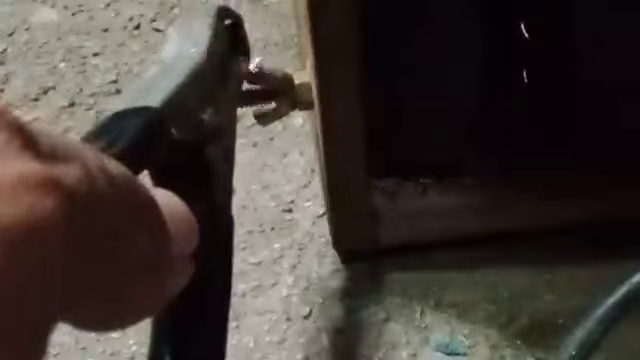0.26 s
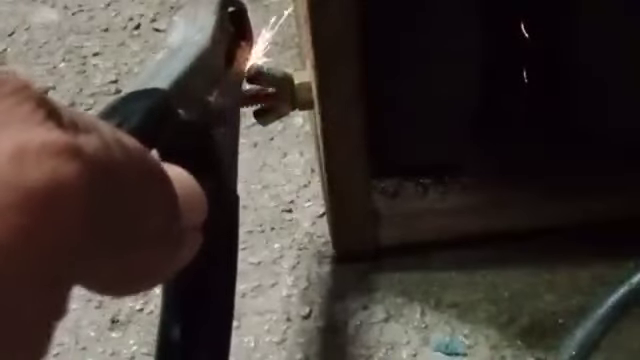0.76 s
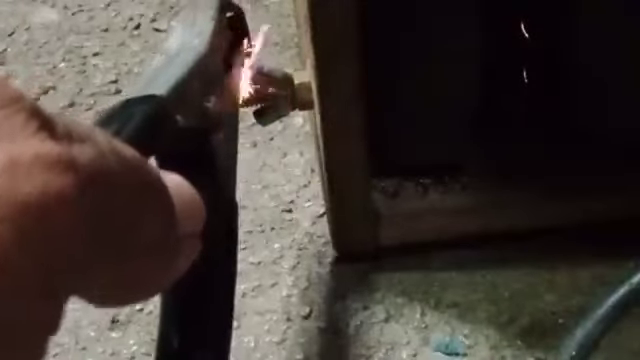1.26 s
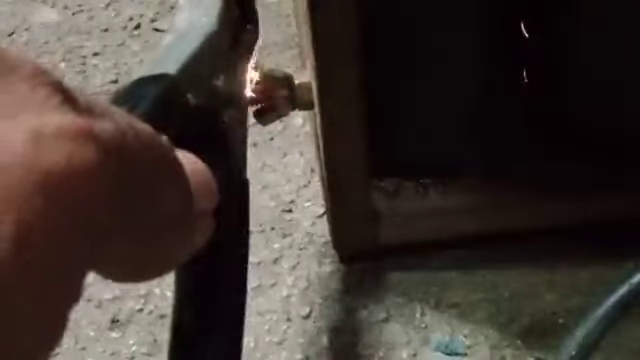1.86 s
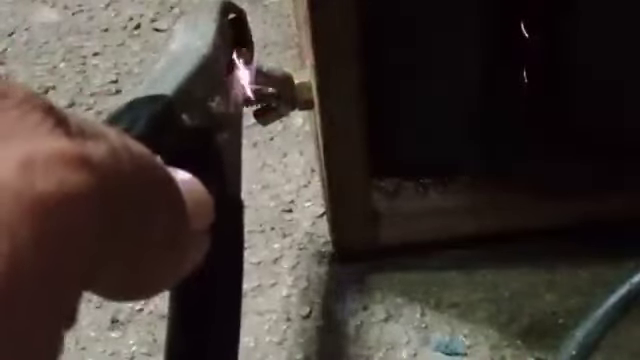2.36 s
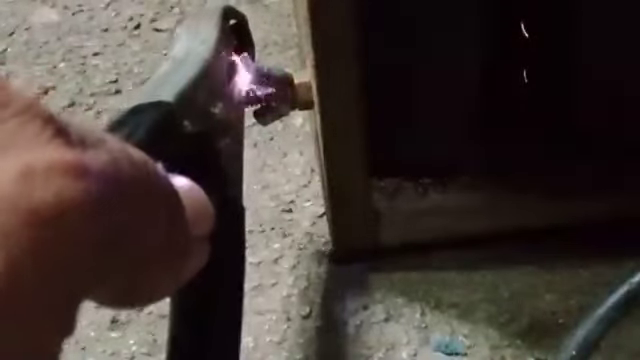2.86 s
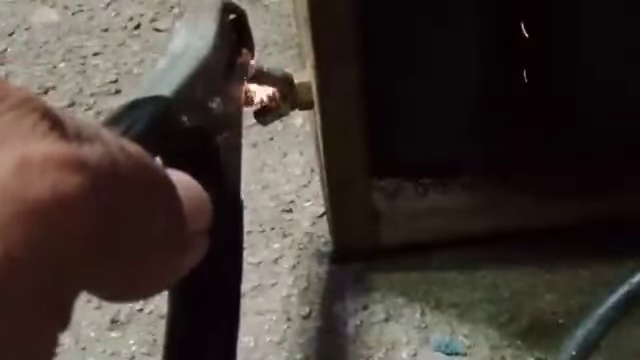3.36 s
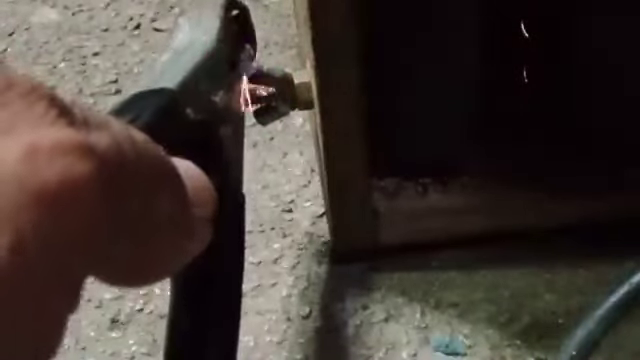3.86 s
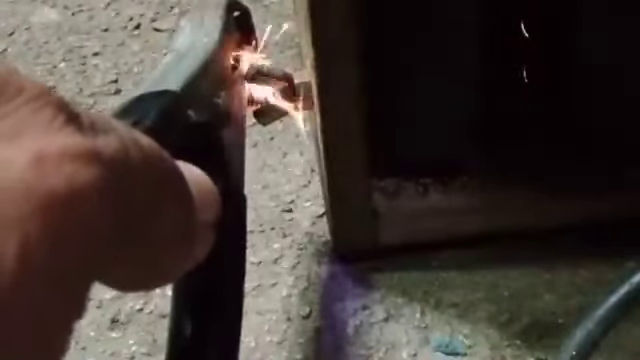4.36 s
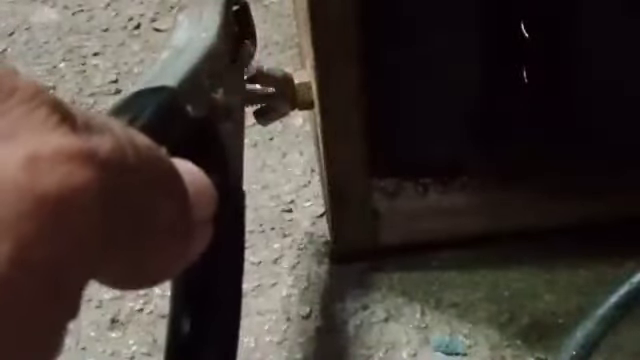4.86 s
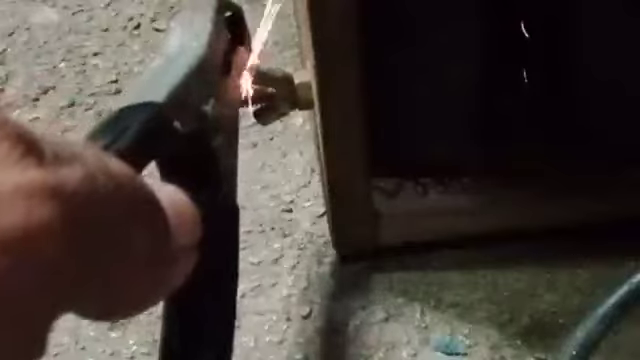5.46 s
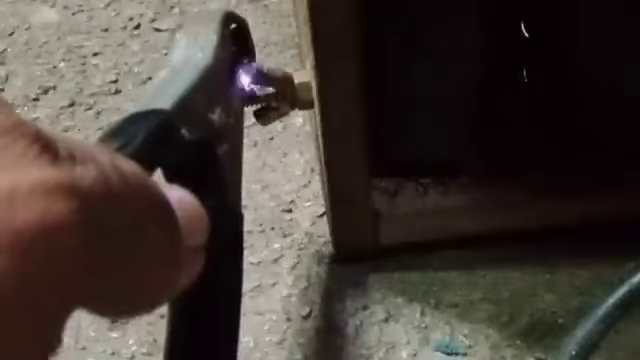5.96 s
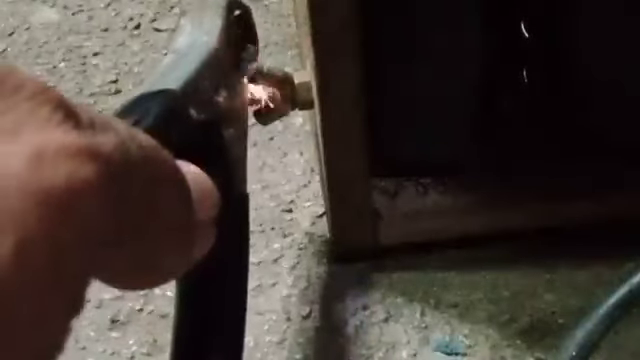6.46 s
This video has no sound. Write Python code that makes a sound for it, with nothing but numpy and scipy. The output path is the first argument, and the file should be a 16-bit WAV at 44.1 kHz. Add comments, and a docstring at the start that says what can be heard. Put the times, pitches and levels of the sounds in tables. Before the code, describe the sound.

From 0 to about 6.7 seconds a high-voltage arc buzzes without pause, close to the microphone in a small, quiet room. Around 333 uneven snaps a second fuse into a shrill, raspy buzz, strongest between about 2 and 4.5 kHz, with a fainter bright sizzle above it. Two small dry ticks fall near 0.15 and 0.35 seconds. Short sputters make the pitch sag slightly and the tone roughen, notably around 0.65, 1.0, 1.7, 2.6, 2.8 and 3.1. Near 2.2 the arc flares for about a tenth of a second, louder, brighter and slightly higher, with a dull puff. Further sputters come near 4.4, 5.3 and 5.9, with the strongest around 6.3 and at the very end, where the buzz is still running. Faint hum, low rumble and barely audible hollow blips lie beneath.

```python
"""A shrill electric buzz: a high-voltage arc jumps between a hand-held probe and a terminal, close by.
The gap fires about 333 times a second and every spark is a snap of a different size. The buzz sags
and roughens whenever the arc sputters, and flares up once. A bright sizzle is the edge of the same
snaps, scattered round the room. The supply hums at the firing rate, over filtered noise for a quiet
room, two small ticks made of short pushes, and faint hollow blips made of narrow noise."""
import sys
import numpy as np
from scipy import signal
from scipy.fft import rfft, irfft, next_fast_len
from scipy.io import wavfile
from scipy.ndimage import uniform_filter1d

SR = 44100
rng = np.random.default_rng(int(sys.argv[2]) if len(sys.argv) > 2 else 0)


def persist_wave(psi):
    """Save psi, clipped to +-1, as 16-bit WAV."""
    counts = np.round(np.clip(psi, -1, 1) * 32767).astype(np.int16)
    wavfile.write(sys.argv[1], SR, np.atleast_2d(counts).T)


N = 295822
TIME = np.arange(N) / SR  # [s]
FLARE_S, FLARE_LENGTH_S = 2.21, 0.09  # middle and length of the one flare


def amp(db):
    """Turns decibels into a gain."""
    return 10 ** (np.asarray(db) / 20)


def unit(x):
    """Scales a signal to an average (RMS) level of 1."""
    return x / np.sqrt(np.mean(x ** 2) + 1e-20)


def read(points, hz):
    """Reads a (frequency, value) table at any frequency, with straight lines on a log-frequency axis."""
    frequency, value = np.transpose(points)
    return np.interp(np.log(hz + 1), np.log(frequency + 1), value)


def control(table, column, t):
    """Reads one column of a table that changes over time, with straight lines between its points."""
    table = np.array(table)
    return np.interp(t, table[:, 0], table[:, column])


def add(mix, start_s, sound):
    """Adds a short sound to the mix at a given time."""
    part = mix[max(round(start_s * SR), 0):][:len(sound)]
    part += sound[:len(part)]


def wander(size):
    """Slow random motion of unit spread, smoothed twice over size samples."""
    once = uniform_filter1d(rng.standard_normal(N), size, mode="wrap")
    return unit(uniform_filter1d(once, size, mode="wrap"))


def flutter(depth_db, size):
    """A gain that wavers at random."""
    return amp(depth_db * wander(size))


def arch(middle_s, length_s):
    """A smooth rise to 1 and back, above one half for length_s."""
    return np.cos(np.pi / 2 * np.clip((TIME - middle_s) / length_s, -1, 1)) ** 2


def colour(x, spectrum, resonances=(), size=8192):
    """Filters a sound with a broad spectrum plus peaks and notches, without any sound ahead of time."""
    hz = np.fft.rfftfreq(size, 1 / SR)
    db = read(spectrum, hz)
    for middle_hz, width_hz, gain_db in resonances:
        db = db + gain_db / (1 + (2 * (hz - middle_hz) / width_hz) ** 2)
    # folding the cepstrum forward makes the filter respond as early as it can (minimum phase)
    cepstrum = irfft(np.log(amp(db)))
    cepstrum[1:size // 2] *= 2
    cepstrum[size // 2 + 1:] = 0
    response = irfft(np.exp(rfft(cepstrum)))
    return signal.oaconvolve(x, response)[:len(x)]


def steady(x, window_s):
    """Brings the short-term level to 1 and keeps the faster flutter."""
    return x / np.sqrt(uniform_filter1d(x ** 2, int(window_s * SR)) + 1e-12)


def room(x, reflected_db, t60, rise_s, even_hz):
    """Direct sound plus dense reflections that build up over rise_s and fall 60 dB in t60 seconds."""
    t, size = np.arange(SR // 3) / SR, next_fast_len(N + SR // 2)
    decay = amp(-60 * t / t60) * (1 - np.exp(-t / rise_s))
    tail = rng.standard_normal(len(t)) * decay
    response = 1 + amp(reflected_db) * rfft(tail / np.linalg.norm(tail), size)
    # flatten the colour over bands wider than even_hz
    response /= np.sqrt(uniform_filter1d(abs(response) ** 2, int(even_hz * size / SR)))
    return irfft(rfft(x, size) * response, size)[:N]


def impulses(spark_s, size):
    """A band-limited impulse at the exact time of each spark, even between two samples."""
    index = (spark_s * SR).astype(int)[:, None] + np.arange(-8, 9)
    offset = index - spark_s[:, None] * SR
    shape = np.sinc(offset) * np.sinc(offset / 9)
    train = np.zeros(N)
    np.add.at(train, np.clip(index, 0, N - 1), size[:, None] * shape)
    return train


def disperse(x, sweep_s, top_hz):
    """Below top_hz, lower pitches arrive later: each snap becomes a tiny falling chirp."""
    size = next_fast_len(N + 1024)
    hz = np.fft.rfftfreq(size, 1 / SR)
    delay_s = sweep_s * np.maximum(1 - hz / top_hz, 0)
    phase = 2 * np.pi * np.cumsum(delay_s) * SR / size
    return irfft(rfft(x, size) * np.exp(-1j * phase), size)[:N]


# colour of the low room rumble: (frequency [Hz], relative level [dB])
RUMBLE_COLOUR = [(15, -41), (25, -12), (59, -9), (134, -6), (167, -8), (280, -6.5), (360, -21), (620, -120)]
# colour of the dull rush under the buzz: (frequency [Hz], relative level [dB])
RUSH_COLOUR = [(150, -17.5), (290, 1), (370, 1.5), (460, -18), (560, -6.5), (700, -3), (900, -5),
               (1150, -8), (1500, -21)]


def background(floor_db, rush_db, flare_db):
    """Filtered noise: a quiet room rumble, and a dull rush that comes and goes and puffs up with the flare."""
    rumble, rush = rng.standard_normal((2, N))
    rumble = unit(colour(rumble, RUMBLE_COLOUR)) * flutter(depth_db=2.0, size=3000)
    rush = unit(colour(rush, RUSH_COLOUR)) * flutter(depth_db=4.0, size=1500)
    rush_level_db = rush_db + flare_db * arch(FLARE_S, FLARE_LENGTH_S)
    return amp(floor_db) * rumble + amp(rush_level_db) * rush


# faint hollow blips: (time [s], level at the top of the swell [dB], pitch [Hz])
BLIPS = [(0.536, -54, 697), (0.722, -58, 680), (1.046, -59, 670), (1.449, -62, 764), (1.806, -61, 685),
         (2.18, -58, 677), (2.335, -60, 662), (3.87, -60, 750), (4.825, -59, 677), (5.185, -56, 683),
         (5.554, -62, 737), (5.622, -62, 721), (6.326, -57, 696)]


def blips(swell_s, width_hz):
    """Each blip is narrow noise that swells for swell_s and softly dies away."""
    out, t = np.zeros(N), np.arange(SR // 4) / SR
    swell = t / swell_s * np.exp(1 - t / swell_s)
    for start_s, level_db, hz in BLIPS:
        edges = [hz - width_hz / 2, hz + width_hz]
        band = signal.butter(2, edges, "band", fs=SR, output="sos")
        noise = unit(signal.sosfilt(band, rng.standard_normal(len(t))))
        add(out, start_s, amp(level_db) * swell * noise)
    return out


# small dry ticks: (time [s], peak level before the final band limit [dB])
TICKS = [(0.146, -19), (0.355, -23)]


def ticks(decay_s):
    """Each tick is a single short push, followed by a weaker pull back."""
    out, t = np.zeros(N), np.arange(SR // 4) / SR
    for start_s, peak_db in TICKS:
        add(out, start_s, amp(peak_db) * (1 - t / decay_s) * np.exp(-t / decay_s))
    return out


def hum(cycles, level_db):
    """The supply hums as a sine at the firing rate, a little unsteadily."""
    return amp(level_db) * unit(np.sin(2 * np.pi * cycles) * flutter(depth_db=1.06, size=500))


# slow drift of the firing as the hand moves the probe, before sputters and flare:
# (time [s], firing rate [sparks per second])
FIRING_RATE = [(0.0, 333.6), (1.2, 335.5), (1.4, 328.2), (1.6, 334.4), (2.0, 335.9), (2.1, 332.5),
               (2.3, 335.3), (3.8, 334.2), (3.9, 334.8), (4.1, 332.7), (4.5, 335.4), (6.7, 335.0)]
# slow drift of the loudness, before sputters, flare, shimmer and trims:
# (time [s], buzz level [dB], sizzle level [dB])
LOUDNESS = [(0.0, -17.5, -40.1), (0.8, -19.0, -42), (0.9, -17.5, -40), (1.5, -18.5, -41), (1.6, -17.0, -40),
            (2.1, -18.5, -41.5), (2.3, -16.5, -39), (2.5, -17.5, -40.5), (2.6, -17, -38.5), (3.0, -19, -42),
            (3.1, -17.5, -40), (3.5, -18.5, -41), (4.1, -17, -39.5), (4.2, -18.5, -41.3),
            (4.3, -17.5, -39.5), (4.4, -18.5, -41.5), (4.9, -17.5, -40.5), (6.7, -18.5, -41.9)]
# sputters, in which the gap fires late, hard and unevenly: (middle time [s], length [s], strength [0-1])
SPUTTERS = [(.65, 0.083, 0.68), (1.004, 0.13, 0.48), (1.167, 0.064, 0.51), (1.69, 0.12, .45),
            (1.805, .05, 0.42), (1.951, 0.044, .35), (2.276, .06, 0.42), (2.575, 0.073, 0.56),
            (2.773, .12, 0.7), (3.11, .07, 0.5), (3.437, 0.045, 0.44), (3.688, 0.099, 0.42),
            (4.008, 0.058, 0.4), (4.40, .09, .75), (5.312, 0.065, 0.56), (5.489, 0.074, 0.44),
            (5.869, 0.073, 0.66), (6.278, 0.13, 0.99), (6.444, 0.055, 0.45), (6.70, 0.055, 1)]
SPUTTER_SAG_HZ, SPUTTER_DB = 9.5, 0.8  # what a full sputter takes from the rate and adds to the buzz
FIDGET, FIDGET_S = 0.09, 0.03  # strength and smoothing time of a small random change in the sputtering
# the flare is faster, louder and brighter
FLARE_HZ, FLARE_BUZZ_DB, FLARE_SIZZLE_DB = 10.5, 2.5, 4
# unevenness of the sparks (0-1) at rest, and what a full sputter and the flare add
CALM_UNEVEN, SPUTTER_UNEVEN, FLARE_UNEVEN = 0.47, 0.39, 0.28
# rough and clean spells of a few sparks come and go: their depth and smoothing time
SPELL_UNEVEN, SPELL_S = 0.138, 0.0163


def arc_state(shimmer_db):
    """Sputters and the flare shift the firing rate and unevenness, and the levels of buzz and sizzle."""
    sputter = FIDGET * wander(int(FIDGET_S * SR))
    for middle_s, length_s, strength in SPUTTERS:
        sputter += strength * arch(middle_s, length_s)
    flare = arch(FLARE_S, FLARE_LENGTH_S)
    rate = control(FIRING_RATE, column=1, t=TIME) - SPUTTER_SAG_HZ * sputter + FLARE_HZ * flare
    spells = SPELL_UNEVEN * wander(int(SPELL_S * SR))
    unevenness = CALM_UNEVEN + SPUTTER_UNEVEN * sputter + FLARE_UNEVEN * flare + spells
    buzz_db = control(LOUDNESS, column=1, t=TIME) + FLARE_BUZZ_DB * flare + SPUTTER_DB * sputter
    buzz_db += shimmer_db * wander(size=1300)
    sizzle_db = control(LOUDNESS, column=2, t=TIME) + FLARE_SIZZLE_DB * flare
    return rate, np.clip(unevenness, 0, 1), buzz_db, sizzle_db


def sparks(cycles, unevenness, spread, lag_s, jitter_s, misfire, stray_s, memory):
    """Times and sizes of the sparks. A gap that holds out longer breaks down later and harder."""
    on_time_s = np.interp(np.arange(1, int(cycles[-1])), cycles, TIME)
    chance, scatter, luck, stray = rng.standard_normal((3000, 4))[:len(on_time_s)].T
    uneven = np.interp(on_time_s, TIME, unevenness)
    # a hard spark leaves hot air behind, so the next two come easier
    hold = unit(signal.lfilter([1], [1, memory / 2, memory], chance))
    excess = np.sqrt(uneven) / (1 + np.exp(1.1 - 1.65 * hold))
    # a late spark also delays the charging for the next ones
    drift_s = signal.lfilter([1], [1, -0.8], jitter_s * uneven * scatter)
    # now and then a restless arc gives only a feeble spark, out of step
    failed = luck * uneven > misfire
    spark_s = on_time_s + lag_s * excess + drift_s + failed * stray_s * stray
    size = (1 + spread * excess) * np.where(failed, 0.45, 1)
    return spark_s, size


# colour of the sizzle: (frequency [Hz], relative level [dB])
SIZZLE_COLOUR = [(2760, -21.5), (4700, -2.5), (5090, -9), (5530, -4), (6570, -8.5), (7040, -11.5),
                 (7880, -8.5), (9040, -13), (9450, -31.5), (10000, -14.5), (11600, -24.5), (13100, -19),
                 (13900, -43), (14550, -15), (15050, -23), (15400, -14.5)]
# peaks and notches on the sizzle: (frequency [Hz], width [Hz], gain [dB])
SIZZLE_RESONANCES = [(4970, 120, 5), (5900, 60, -3), (6610, 130, 9.5), (8500, 260, -11), (8700, 260, 3.5),
                     (9650, 300, 4)]


def sizzle(spark_s, size, trim_db, room_db, hiss_db):
    """The bright edge of each snap with its puff of hiss, heard largely by reflection."""
    train = impulses(spark_s, np.sqrt(size))
    puff_level = signal.lfilter([1], [1, -np.exp(-1 / 80)], abs(train))  # fades over 80 samples
    puffs = puff_level * rng.standard_normal(N)
    edge = unit(train) + amp(hiss_db) * unit(puffs)
    scattered = room(edge, room_db, t60=0.037, rise_s=0.0015, even_hz=180)
    bright = colour(scattered, SIZZLE_COLOUR, SIZZLE_RESONANCES)
    bright = signal.sosfilt(signal.butter(4, 2000, "high", fs=SR, output="sos"), bright)
    return amp(trim_db) * steady(bright, window_s=0.11)


# broad colour of one snap: (frequency [Hz], relative level [dB])
SNAP_COLOUR = [(720, -82), (1000, -37), (1180, -28.5), (1300, -21.5), (1850, -6.5), (2400, 0), (2800, -18),
               (3050, -8), (3800, -4.5), (4400, -11), (4850, -34.5), (6600, -41.5), (12000, -52)]
# peaks and notches that nearby surfaces put on the snap: (frequency [Hz], width [Hz], gain [dB])
SNAP_RESONANCES = [(1006.4, 31, -16), (1265, 39, 8), (1563, 97, -6), (1657.7, 65, -10.5), (1731, 38, -12),
                   (2001.5, 54.4, -13.5), (2190, 74, -4.5), (2333, 217, -10), (2587, 20, -6),
                   (2708, 36, -5.5), (3084, 104, 6.5), (3258, 130, 12.5), (3291, 300, -10), (3373, 27, 9.5),
                   (3570, 43, 7.5), (3800, 80, 7), (3886, 104, 6.5), (4010, 27, -11), (4270, 23, -3.5),
                   (4340, 37, 0.5), (4660, 94, -2)]


def buzz(spark_s, size, trim_db, room_db, path_change):
    """The snaps ring in the mid treble, mostly direct; in quick succession they make the buzz."""
    # each spark takes a slightly different path, so some are fuller and some thinner
    fullness = impulses(spark_s, path_change * size * rng.standard_normal(len(spark_s)))
    low_pass = signal.butter(3, 2800, fs=SR, output="sos")
    train = impulses(spark_s, size) + signal.sosfiltfilt(low_pass, fullness)
    snaps = colour(train, SNAP_COLOUR, SNAP_RESONANCES)
    snaps = disperse(snaps, sweep_s=0.001531, top_hz=4776)
    wet = room(snaps, room_db, t60=0.15, rise_s=0.0014, even_hz=29.2)
    return amp(trim_db) * steady(wet, window_s=0.046)


def scene():
    """Buzz, sizzle and hum all follow the same firing, over a quiet room."""
    rate, unevenness, buzz_db, sizzle_db = arc_state(shimmer_db=0.47)
    cycles = np.cumsum(rate) / SR  # firings so far
    spark_s, size = sparks(cycles, unevenness, spread=0.69, lag_s=1e-4, jitter_s=4.5e-5,
                           misfire=1.5, stray_s=0.00051, memory=0.16)
    mix = background(floor_db=-77, rush_db=-68.0, flare_db=10)
    mix += blips(swell_s=0.017, width_hz=55)
    mix += ticks(decay_s=0.00025)
    mix += hum(cycles, level_db=-57.5)
    mix += amp(sizzle_db) * sizzle(spark_s, size, trim_db=1.5, room_db=25, hiss_db=-4)
    mix += amp(buzz_db) * buzz(spark_s, size, trim_db=0.1, room_db=-6, path_change=0.085)
    return mix[None]


def record(dry):
    """A steep filter removes everything above about 15.5 kHz."""
    edge = signal.firwin(511, 15500, window=("kaiser", 9), fs=SR)
    return signal.oaconvolve(dry, edge[None], "same")


dry = scene()
out = record(dry)
persist_wave(out)
```